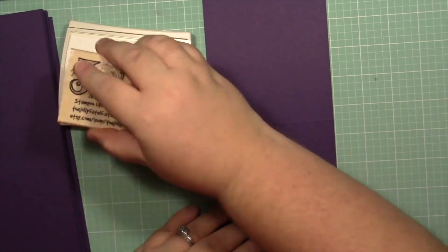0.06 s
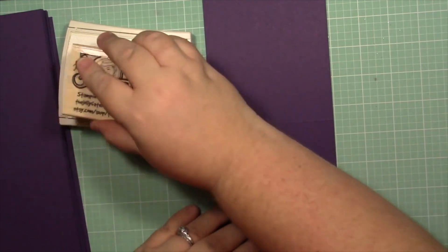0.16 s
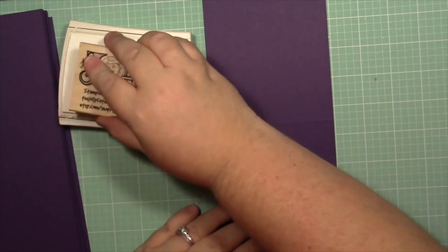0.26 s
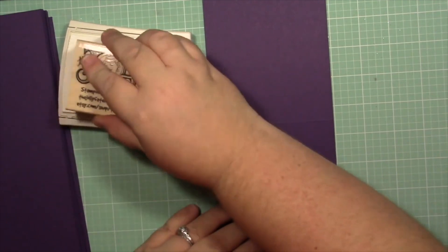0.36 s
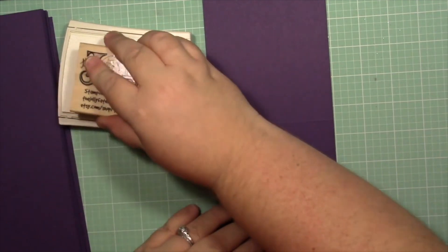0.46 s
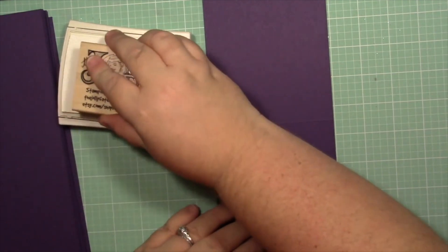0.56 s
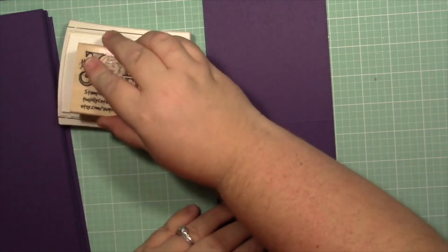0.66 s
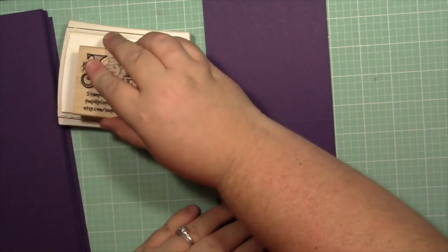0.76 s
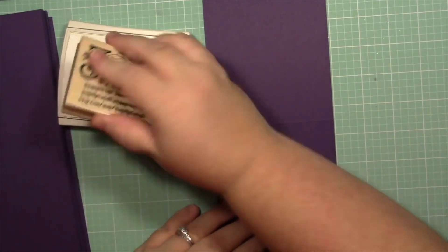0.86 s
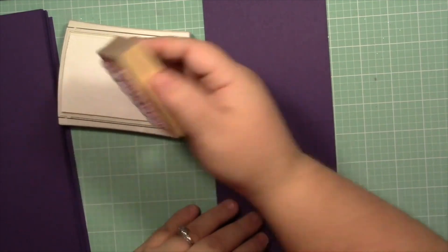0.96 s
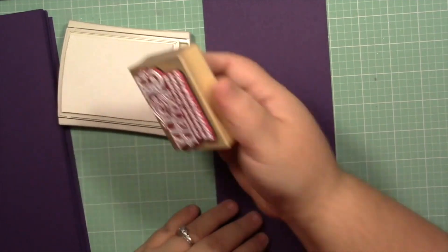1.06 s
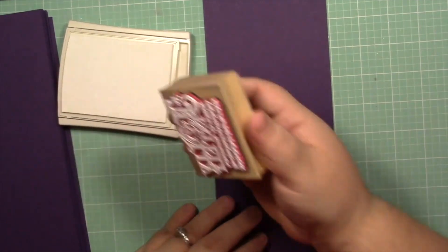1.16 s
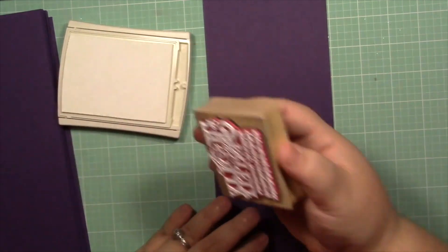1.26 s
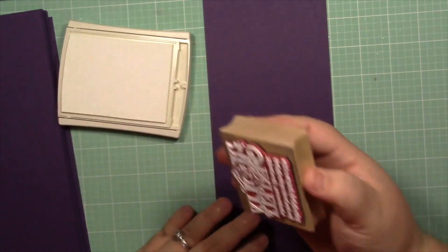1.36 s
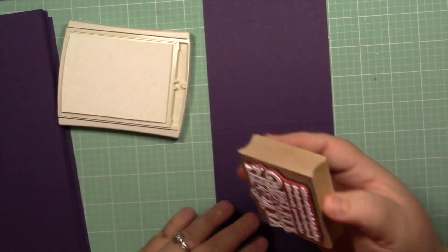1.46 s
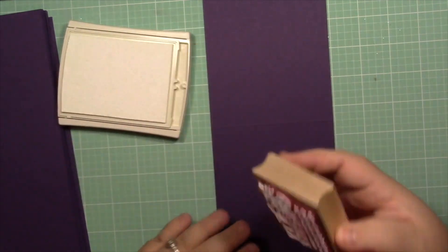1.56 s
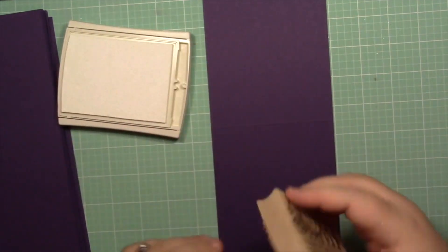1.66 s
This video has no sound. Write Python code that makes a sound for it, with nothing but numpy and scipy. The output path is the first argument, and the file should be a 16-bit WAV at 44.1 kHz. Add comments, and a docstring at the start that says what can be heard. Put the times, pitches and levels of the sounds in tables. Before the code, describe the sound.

Four quick knocks of a rubber stamp on an ink pad, then a light plastic clatter.

```python
"""At a craft table in a small room, a wooden rubber stamp is tapped four times on an ink pad.
Each tap is a soft knock, a clack from the pad's plastic case, a hard click and a thump of the table.
The sticky rubber peels off between taps; the last lift picks up the case, which drops back on the mat.
Then the stamp is carried away with a soft brushing sound.
Behind it all are low room noise, a swelling hiss and a faint regular tick."""
import sys
import numpy as np
from scipy import signal
from scipy.fft import rfft, irfft, next_fast_len
from scipy.io import wavfile

SR = 44100
rng = np.random.default_rng(int(sys.argv[2]) if len(sys.argv) > 2 else 0)


def log_audio(samples):
    """Write samples as a 16-bit WAV file to the path given in sys.argv[1]."""
    # one column per channel
    frames = np.atleast_2d(samples).T
    # limit to full scale, then quantise
    limited = np.clip(frames, -1, 1)
    pcm = np.round(limited * 32767).astype(np.int16)
    wavfile.write(sys.argv[1], SR, pcm)


N = 74970

# The tone of the low room noise and of the hiss. Each row: frequency in Hz, relative level in dB.
RUMBLE_TONE = [(15, -34), (25, -21.5), (173, 3), (209, -1), (305, 1), (501, -0.5), (637, -2.5), (718, -2),
               (769, -4), (913, -4.5), (1500, -8.5), (1950, -16), (3300, -120)]
HISS_TONE = [(410, -14.5), (700, -12), (1100, -13), (1290, -9), (1780, -5.5), (2130, -4.5), (4300, -8.5),
             (5500, -12), (10900, -19), (15500, -26.5)]
# How loud those two are over time. Each row: time in seconds, level in dB.
RUMBLE_LEVELS = [(0, -59), (.2, -59), (1.0, -58.5), (1.7, -57.5)]
HISS_LEVELS = [(0, -65.5), (.2, -65), (.6, -64), (.92, -65.5), (1.07, -59), (1.25, -59.5), (1.5, -60),
               (1.7, -58)]
# How long the room echoes. Each row: frequency in Hz, seconds to fade by 60 dB.
ECHO_FADE = [(100, 0.44), (300, 0.33), (700, 0.42), (2000, 0.41), (5000, 0.49), (12000, 0.44)]
# The tone of that echo. Each row: frequency in Hz, gain in dB.
ECHO_TONE = [(60, 1.5), (150, 1.5), (300, -2.5), (600, -12.5), (1100, -7.5), (2000, -14.5), (5000, -12),
             (12000, -14)]
# How much left and right differ for the background, the echo and close sounds.
# Each row: frequency in Hz, gain of the differing part in dB.
BACKGROUND_WIDTH = [(60, -7.5), (400, -2.5), (2400, -6), (4400, -43)]
ECHO_WIDTH = [(60, -32), (250, -41), (700, -31), (1400, -22), (3300, -52), (7000, -52)]
CLOSE_WIDTH = [(700, -42), (2400, -46), (4400, -46), (7500, -33), (12000, -42)]
# How sounds lean to one side. Each row: frequency in Hz, left level minus right level in dB.
BACKGROUND_LEAN = [(700, -1.3), (2400, -1), (4400, 0)]
CLOSE_LEAN = [(2000, 0), (3300, -.6), (5500, -1), (9000, 0)]

# Rubber peeling off the ink, skin sliding on the wood, and the soft brush of handling.
# Each row: start in seconds, level in dB, seconds to reach the peak.
PEEL_PUFFS = [(.3255, -54.5, 0.0044), (.503, -54, 0.0031), (.625, -57, 0.0094), (.6395, -41, 0.0009),
              (.7925, -43, 0.0037)]
SLIDE_PUFFS = [(1.06, -66, 0.0066), (1.112, -65.5, 0.012), (1.161, -65, 0.0021)]
BRUSH_PUFFS = [(1.28, -48, 0.029)]
# The tone of those three noises. Each row: frequency in Hz, relative level in dB.
PEEL_TONE = [(100, -27), (500, 0.5), (1700, 0.5), (4000, -1), (6500, 3), (8000, -2), (10000, -7),
             (13000, -8.5), (15500, -34)]
SLIDE_TONE = [(2000, -22), (6000, -20), (11000, 2), (15500, -12)]
BRUSH_TONE = [(60, -31), (150, -24), (300, -15), (510, 9.5), (700, -2), (1000, -2.5), (1600, -3),
              (2300, -19), (8000, -35)]

# The four taps. Each row: time in seconds, knock level in dB, knock pitch factor, knock length factor,
# clack level in dB, clack pitch factor, rim level in dB, rim base pitch in Hz, click level in dB,
# click treble limit in Hz, table thump level in dB, case hum level in dB, echo gain in dB.
STAMP_TAPS = [(0.2331, -17, 0.98, 0.58, -20.5, 1.046, -30, 1680, -20, 8200, -44, -42, 0),
              (0.4181, -4, 0.97, 1.217, -13.5, 1.138, -16.5, 1483, -13, 14900, -35, -30.5, -0.5),
              (0.5646, -19, 0.95, 0.55, -24, 1.016, -32, 1720, -23, 7800, -40.5, -31, 0.5),
              (0.7078, -13.5, 0.94, 0.95, -17.5, 1.01, -28.5, 1760, -21.5, 8350, -36, -50, 1)]
# The muffled notes of the block knocking on the pad and of the case clacking under it.
# Each row: base pitch in Hz, relative level in dB, base time to the peak in seconds.
KNOCK_NOTES = [(158, -25, 0.0055), (327.7, -17.5, 0.00578), (631.3, 1.5, 0.003456), (671, -6, 0.004237)]
CLACK_NOTES = [(1085, -1, 0.001986), (1320, -22, 0.00179)]
# The ringing notes of the stamp's click, the table, the humming case and the dropped case.
# Each row: pitch in Hz, relative level in dB, seconds to fade by 60 dB.
CLICK_NOTES = [(2376, -8.5, 0.016), (2840, -7, 0.013), (3247, -8.5, 0.012), (3570, -14.5, 0.018),
               (3955, -4.5, 0.013), (4420, -18, 0.018), (5790, -7, 0.011), (6730, -10.5, 0.019),
               (8580, -27, 0.008), (9330, -16, 0.0089), (10860, -13, .009)]
TABLE_NOTES = [(89.4, 3.5, 0.22), (125.2, -3.5, 0.39), (200.3, 0.5, 0.2), (290.3, -3, 0.43),
               (354, 1.5, 0.14), (559.7, 5, 0.18), (763, 6.5, 0.082), (1224, -3, 0.13)]
HUM_NOTES = [(933, 2.5, 0.098), (2810, -15.5, 0.17), (2720, -14, 0.052)]
DROP_NOTES = [(200, -6.5, 0.085), (420, 3.5, 0.02), (570, -0.5, 0.025), (720, 1.5, 0.032),
              (995, -0.5, 0.041), (1190, 0, 0.029), (1717, 5.5, 0.019), (2220, -11, 0.011),
              (2570, -4, 0.021), (3700, -4.5, 0.011), (4360, -16, 0.013)]
# The tone of the contact noise in the click, and of what the click and the drop send into the room.
# Each row: frequency in Hz, relative level in dB.
CRACK_TONE = [(300, -26), (1400, -5), (2050, -33), (2800, -12), (4500, 0.5), (7500, -1.5), (11000, -3),
              (15500, -19)]
CLICK_ROOM_TONE = [(900, -56), (1600, 8.5), (2100, 6), (2800, 3.5), (4300, 1), (7000, -8), (10000, -11.5),
                   (15500, -24)]
DROP_ROOM_TONE = [(150, -6), (450, 10.5), (1100, 7.5), (1800, 3), (2700, 0.5), (4500, -15), (12000, -28)]


def amp(db):
    """Turns decibels into a number to multiply by."""
    return 10 ** (np.asarray(db) / 20)


def along(points, hz):
    """Reads between the rows of a (Hz, value) table, on a log frequency scale."""
    frequencies, values = np.transpose(points)
    return np.interp(np.log(hz + 1), np.log(frequencies + 1), values)


def since(start_s):
    """A clock in seconds that stays at zero until start_s."""
    return np.maximum(np.arange(N) / SR - start_s, 0)


def filtered(x, gain_at):
    """Turns each frequency in x up or down by gain_at(hz)."""
    size = next_fast_len(N + SR // 2)
    hz = np.fft.rfftfreq(size, 1 / SR)
    return irfft(rfft(x, size) * gain_at(hz), size)[..., :N]


def shaped(x, tone):
    """Filters x with a (Hz, dB) table."""
    return filtered(x, lambda hz: amp(along(tone, hz)))


def noise(tone):
    """Noise with the given tone and an average (rms) size of 1."""
    x = shaped(rng.standard_normal(N), tone)
    return x / np.sqrt(np.mean(x ** 2) + 1e-20)


def burst(t, tone, fade_s):
    """A crack of noise that starts at once and falls 60 dB in fade_s."""
    return amp(-60 * t / fade_s) * (t > 0) * noise(tone)


def pulse(at_s, tone):
    """One sharp push with the given tone."""
    return shaped(signal.unit_impulse(N, round(at_s * SR)), tone)


def swell(t, peak_s, order):
    """Rises to 1 at peak_s and dies away; a higher order starts more softly."""
    return (t / peak_s * np.exp(1 - t / peak_s)) ** order


def muffled(t, notes, order, pitch=1, length=1):
    """A cushioned blow: each note swells and dies within a few vibrations."""
    out = np.zeros(N)
    for hz, db, base_s in notes:
        peak_s = base_s * length
        out += amp(db) * swell(t, peak_s, order) * np.cos(2 * np.pi * hz * pitch * (t - peak_s))
    return out


def ring(t, notes, scatter_db):
    """A struck object rings and fades; scatter_db varies each note's level at random."""
    out = np.zeros(N)
    for k, (hz, db, fade_s) in enumerate(notes):
        level = amp(db + scatter_db * rng.standard_normal() - 60 * t / fade_s)
        out += (-1) ** k * level * np.sin(2 * np.pi * hz * t)  # every other note starts downward
    return out


def stereo(middle, side, width, lean):
    """Makes left and right by adding the side signal to one and taking it from the other."""
    side = shaped(side, width)
    pair = np.array([middle + side, middle - side])
    return filtered(pair, lambda hz: amp(np.outer([.5, -.5], along(lean, hz))))


def room_echo():
    """The room's answer to a sharp sound: fading noise, strongest when the near walls reply."""
    onset_s, walls_db, walls_s, walls_spread_s = 0.0014, 3, 0.021, 0.013
    hz, t, bands = signal.stft(rng.standard_normal(SR // 2), SR, nperseg=256)
    fade = amp(-60 * t / along(ECHO_FADE, hz)[:, None])
    tail = signal.istft(bands * fade, SR, nperseg=256)[1]
    t = np.arange(len(tail)) / SR
    tail = shaped(tail / np.linalg.norm(tail), ECHO_TONE)[:len(t)]
    onset = 1 - np.exp(-(t / onset_s) ** 2)
    near_walls = amp(walls_db * np.exp(-((t - walls_s) / walls_spread_s) ** 2))
    return tail * onset * near_walls


def in_room(direct, sent):
    """A close sound plus the echo of what it sends into the room, almost alike left and right."""
    echo = signal.fftconvolve(sent, room_echo())[:N]
    side_echo = signal.fftconvolve(sent, room_echo())[:N]
    apart = filtered(direct, lambda hz: 1j * amp(along(CLOSE_WIDTH, hz)))  # 1j: a quarter-wave shift
    return stereo(direct + echo, side_echo, ECHO_WIDTH, CLOSE_LEAN) + np.array([apart, -apart])


def room_noise():
    """A low rumble and a hiss that swells after about a second."""
    t = since(0)
    rumble = amp(np.interp(t, *np.transpose(RUMBLE_LEVELS))) * noise(RUMBLE_TONE)
    hiss = amp(np.interp(t, *np.transpose(HISS_LEVELS))) * noise(HISS_TONE)
    return rumble + hiss


def ticking():
    """A faint, even tick whose pitch varies a little each time."""
    first_s, gap_s = 0.07, 0.06665
    base_hz, db, peak_s = 2050, -49.5, 0.001226
    out = np.zeros(N)
    for start_s in np.arange(first_s, N / SR, gap_s):
        hz = base_hz * (1 + 0.02 * rng.standard_normal())
        out += muffled(since(start_s), [(hz, db, peak_s)], order=2)
    return out


def background():
    """The tick sits near the middle and the room noise spreads around it."""
    middle = ticking() + room_noise()
    side = amp(-3) * room_noise()
    return stereo(middle, side, BACKGROUND_WIDTH, BACKGROUND_LEAN)


def puffs(rows, tone):
    """Short swells of rubbing or peeling noise."""
    return sum(amp(db) * swell(since(start_s), peak_s, order=2) * noise(tone)
               for start_s, db, peak_s in rows)


def handling():
    """Rubber peels, skin slides, something brushes softly, and the grip shifts with a tiny snap."""
    snap_tone = [(300, -8), (2000, 3), (4000, -26), (12000, -28)]
    snap = amp(-45) * burst(since(start_s=1.5305), snap_tone, fade_s=0.012)
    peels = puffs(PEEL_PUFFS, PEEL_TONE)
    slides = puffs(SLIDE_PUFFS, SLIDE_TONE)
    brush = puffs(BRUSH_PUFFS, BRUSH_TONE)
    close = peels + slides + brush + snap
    return in_room(close, sent=close)


def case_drop():
    """The case comes unstuck from the stamp and rings briefly as it lands on the soft mat."""
    land_s, rise_s = 0.8019, 0.00042
    t = since(land_s)
    clatter = amp(-30) * ring(t, DROP_NOTES, scatter_db=0.5) * (1 - np.exp(-t / rise_s))
    return in_room(clatter, sent=pulse(land_s, DROP_ROOM_TONE))


def table_thump(t):
    """The table starts to shake just after a tap and rings on."""
    rise_s = 0.014
    return ring(t, TABLE_NOTES, scatter_db=1) * (1 - np.exp(-t / rise_s))


def case_hollow(x, hz, width_hz):
    """The case cancels a narrow band of pitches between the block's knock and its own clack."""
    return signal.lfilter(*signal.iirnotch(hz, hz / width_hz, fs=SR), x)


def stamp_click(at_s, db, limit_hz):
    """The stamp hits bottom with a hard click. Gives the close sound and what goes into the room."""
    t, rise_s = since(at_s), 0.0005
    ringing = ring(t, CLICK_NOTES, scatter_db=2.13)
    crack = amp(-11) * burst(t, CRACK_TONE, fade_s=0.015)
    close = (ringing + crack) * (1 - np.exp(-t / rise_s))
    sent = amp(21) * pulse(at_s, CLICK_ROOM_TONE)
    return amp(db) * filtered([close, sent], lambda hz: 1 / np.sqrt(1 + (hz / limit_hz) ** 6))


def stamp_taps():
    """The soft rubber lands first, then the block clicks, and the case and the table answer."""
    base_lead_s, clack_delay_s, rim_peak_s, hollow_base_hz = 0.00209, 0.00037, 0.001892, 808
    out = np.zeros((2, N))
    for (at_s, knock_db, knock_pitch, knock_length, clack_db, clack_pitch, rim_db, rim_base_hz,
         click_db, limit_hz, thump_db, hum_db, echo_db) in STAMP_TAPS:
        t = since(at_s)
        knock_t = since(at_s - base_lead_s * knock_length)
        clack_t = since(at_s + clack_delay_s)
        knock = amp(knock_db) * muffled(knock_t, KNOCK_NOTES, order=5,
                                        pitch=knock_pitch, length=knock_length)
        clack = amp(clack_db) * muffled(clack_t, CLACK_NOTES, order=3, pitch=clack_pitch, length=0.88)
        # The pitch of the case's rim depends on where the stamp lands.
        rim = muffled(t, [(rim_base_hz, rim_db, rim_peak_s)], order=3, pitch=0.98)
        hum = amp(hum_db) * ring(t, HUM_NOTES, scatter_db=0)
        click, click_sent = stamp_click(at_s, click_db, limit_hz)
        thump = amp(thump_db) * table_thump(t)
        body = case_hollow(knock + clack + rim, hollow_base_hz * clack_pitch, width_hz=90)
        sent = amp(echo_db) * (knock + clack + click_sent)
        out += in_room(body - hum + click + thump, sent)
    return out


def scene():
    """Everything at the table, added together."""
    return stamp_taps() + case_drop() + handling() + background()


def record(dry):
    """Takes away the deepest bass and the very highest treble."""
    low_hz, top_hz = 58, 15800
    low_cut = signal.butter(2, low_hz, "highpass", fs=SR, output="sos")
    return filtered(signal.sosfilt(low_cut, dry), lambda hz: 1 / (1 + (hz / top_hz) ** 120))


dry = scene()
out = record(dry)
log_audio(out)
```